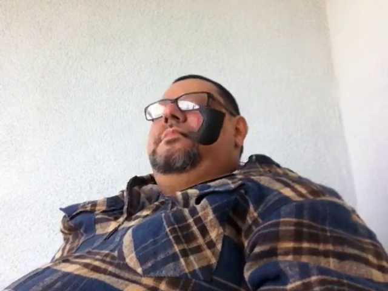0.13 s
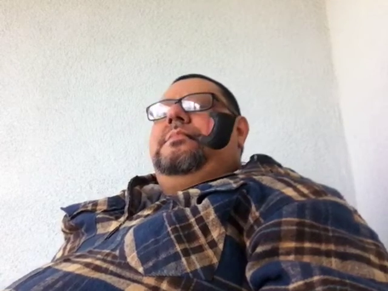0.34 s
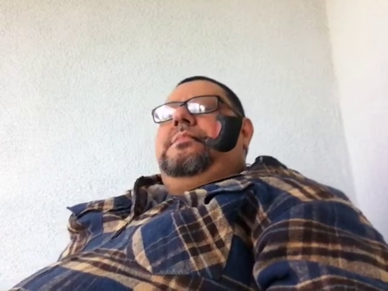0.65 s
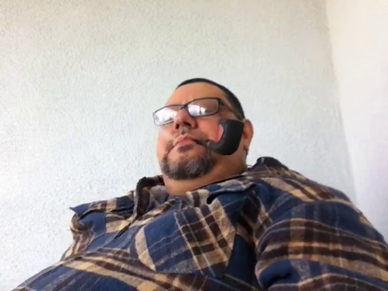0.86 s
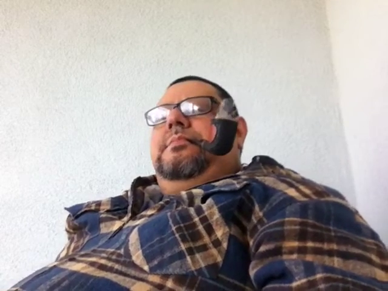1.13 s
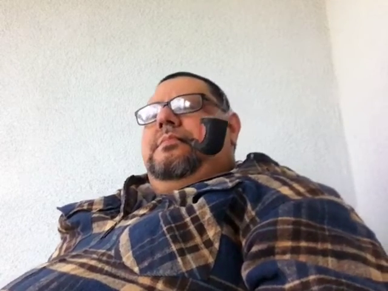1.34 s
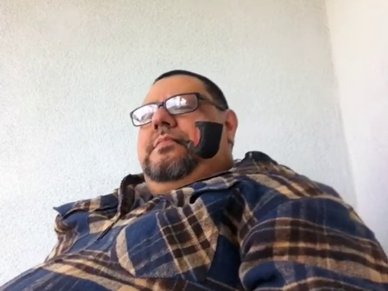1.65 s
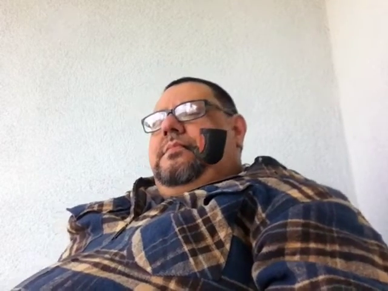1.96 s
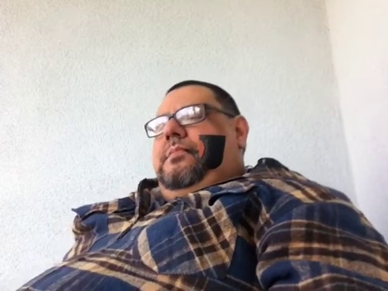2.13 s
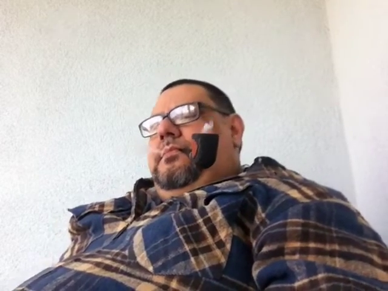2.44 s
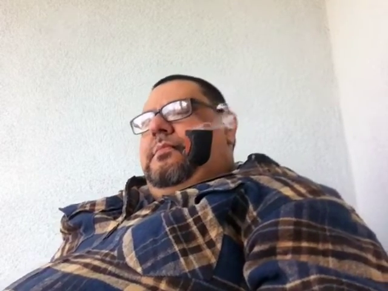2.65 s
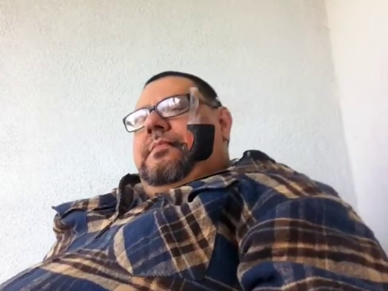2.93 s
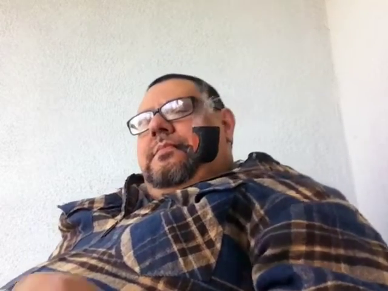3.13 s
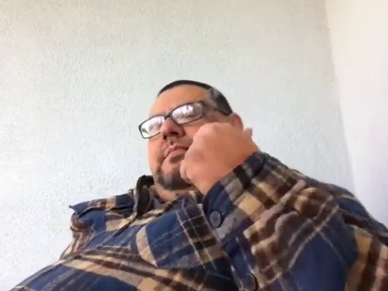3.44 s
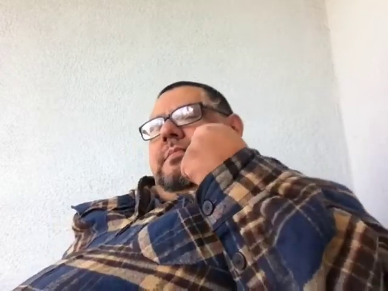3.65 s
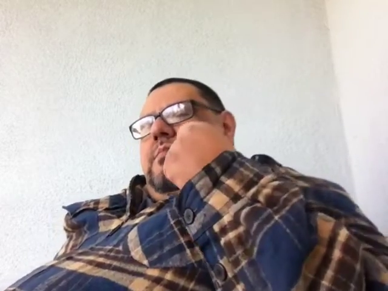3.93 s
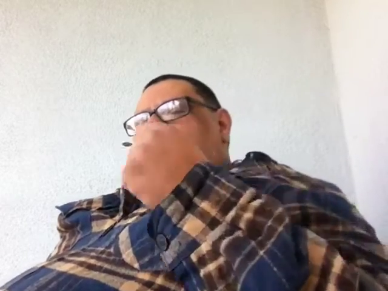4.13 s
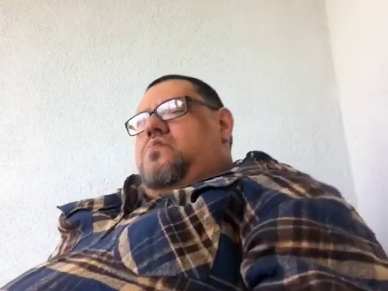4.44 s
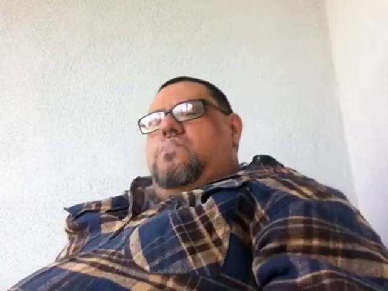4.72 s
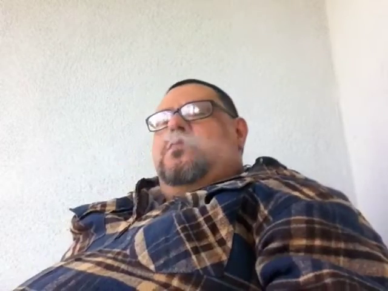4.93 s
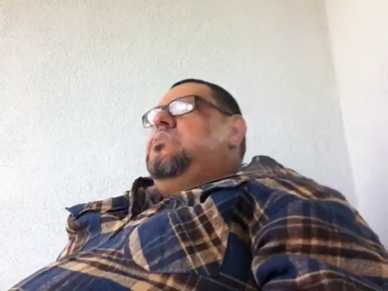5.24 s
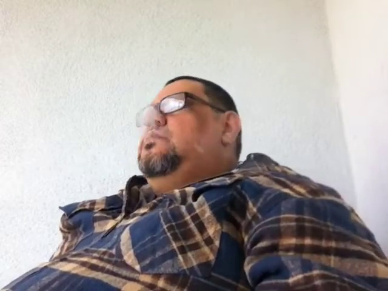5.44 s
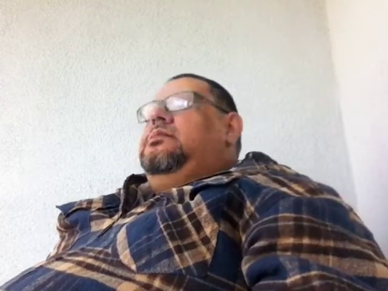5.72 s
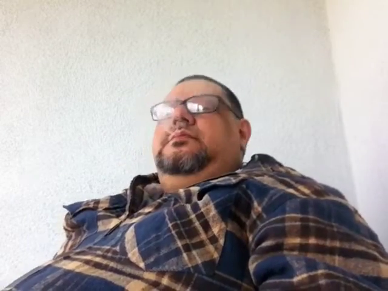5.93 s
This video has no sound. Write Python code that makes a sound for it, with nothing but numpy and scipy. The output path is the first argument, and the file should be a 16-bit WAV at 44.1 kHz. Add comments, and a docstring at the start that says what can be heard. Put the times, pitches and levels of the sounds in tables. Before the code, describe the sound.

Close indoor sound of a chair under a shifting sitter. The first two seconds are sparse, with woody cracks and barely audible chirps over faint room hiss and drone. A firm crack comes next, then brief squeaks. From about three seconds the tilt joint squeals loudly again and again, its pitch bending, one squeal collapsing into a rough scrape.

```python
"""A small, quiet room, with a faint ventilation drone and the microphone close to a desk chair under a shifting sitter.
The frame cracks a few times as it takes the load: each crack is a shaped noise burst with a short ring.
As the chair rocks, two dry contacts in the tilt joint stick and slip.
One sweeps between rasp and whistle: trains of slips, faster or slower with the tilt, kick the joint's resonances.
The other locks into gliding stacks of partials, with faint chirps, then loud squeals, one ending in a rough scrape."""
import sys
import numpy as np
from scipy import signal
from scipy.fft import rfft, irfft, next_fast_len
from scipy.io import wavfile
from scipy.ndimage import uniform_filter1d, map_coordinates

SR = 44100
rng = np.random.default_rng(int(sys.argv[2]) if len(sys.argv) > 2 else 0)


def to_wav(s):
    """Save 16-bit WAV."""
    ch = np.atleast_2d(s).T  # columns
    pcm = np.round(np.clip(ch, -1, 1) * 32767)  # PCM
    wavfile.write(sys.argv[1], SR, pcm.astype(np.int16))


N = 268128  # length in samples
TOP_HZ = 15900  # band limit of the recorder


def amp(db):
    """Decibels to gain."""
    return 10 ** (np.asarray(db) / 20)


def unit(x):
    """Scaled to rms 1."""
    return x / np.sqrt(np.mean(x ** 2) + 1e-20)


def along(points, hz):
    """(Hz, value) points read on a log frequency axis."""
    point_hz, values = np.transpose(points)
    return np.interp(np.log(hz + 1), np.log(point_hz), values)


def curves(rows):
    """Start time in seconds, then one value per sample for each further column."""
    s, *columns = np.transpose(rows)
    t = np.arange(s[0], s[-1], 1 / SR)
    return s[0], *[np.interp(t, s, column) for column in columns]


def wobble(rate, size):
    """A smooth random curve through `rate` random knots a second."""
    knots = rng.standard_normal(int(size * rate / SR) + 4)
    return map_coordinates(knots, [np.arange(size) * rate / SR])


def filtered(x, response):
    """x shaped by a response given as a function of frequency in Hz."""
    m = next_fast_len(len(x) + SR // 4)
    spectrum = rfft(x, m) * response(np.fft.rfftfreq(m, 1 / SR))
    return irfft(spectrum, m)[:len(x)]


def add(track, s, sound):
    """Mix a sound into the track at time s."""
    part = track[max(round(s * SR), 0):][:len(sound)]
    part += sound[:len(part)]


def fade(size):
    """A gate whose ends are rounded over a few milliseconds."""
    return signal.windows.tukey(size, min(1, SR / 150 / size))


def swell(size, attack_s, release_s, fall_db, rise_power=0.59, fall_power=2.24):
    """Level in dB of a rub: it takes hold, stays, then dies ever faster."""
    t = np.arange(1, size + 1) / SR
    rise_db = 20 * rise_power * np.log10(np.minimum(t / attack_s, 1))
    dying = np.clip(1 - (t[-1] - t) / release_s, 0, 1)
    return rise_db - fall_db * dying ** fall_power


# Colour of the room's quiet air. Each row: frequency in Hz, relative level in dB.
AIR_COLOUR = [(15, -73), (25, -31), (64, -23), (123, -3.5), (175, -6.5), (212, -2.5), (249, -4),
              (326, -6.5), (489, -12), (1130, -13.5), (1230, -17), (1440, -19), (2910, -27), (7110, -28.5),
              (16000, -32)]


def ambience(air_db=-59.5, drone_db=-66, drone_hz=209, drone_width_hz=9):
    """Steady room noise, and a soft ventilation drone that wavers because it is a narrow band of noise."""
    air = unit(filtered(rng.standard_normal(N), lambda hz: amp(along(AIR_COLOUR, hz))))
    drone_band = lambda hz: 1 / (1 + ((hz - drone_hz) / drone_width_hz) ** 2)
    drone = unit(filtered(rng.standard_normal(N), drone_band))
    return amp(air_db) * air + amp(drone_db) * drone


# How long the small room rings. Each row: frequency in Hz, time to fall by 60 dB in seconds.
ROOM_DECAY = [(300, 0.33), (1500, 0.29), (4000, 0.24), (9000, 0.2), (15000, 0.042)]


def room(x, gap_s=.004):
    """The small room's tail: diffuse noise after a short gap, in which the treble dies first."""
    hz, t, bands = signal.stft(rng.standard_normal(SR // 2), SR, nperseg=256)
    decay = amp(-60 * t / along(ROOM_DECAY, hz)[:, None])
    tail = signal.istft(bands * decay, SR, nperseg=256)[1]
    tail = np.pad(tail / np.linalg.norm(tail), (int(gap_s * SR), 0))
    return signal.fftconvolve(x, tail)[:N]


# Cracks of the chair's frame as it takes the load. Each row: start in seconds, relative level in dB,
# low thud in dB, bright snap in dB, time to fall by 60 dB in seconds (a fainter ring lasts on).
CRACKS_HEARD = [(0.288, -33, -4, 15, 0.027), (0.486, -51.5, -12, -12, 0.076),
                (0.7995, -26.5, -14, -18, .035), (0.9473, -36, -7.5, -8, 0.078),
                (2.238, -40, 5.5, -14, 0.11), (2.2424, -20.5, 6.5, 3, 0.024)]
# Colour of the frame. Each row: frequency in Hz, relative level in dB.
FRAME_COLOUR = [(150, -41), (300, -24), (480, -14), (700, -5.5), (1000, -9.5), (1430, -1), (1850, -9.5),
                (2500, -3), (3400, -11), (4200, -8.5), (5500, -14), (8000, -18.5), (15500, -19.5)]


def cracks(ring_db=-21, ring_t60=0.13, thud_hz=1100, snap_hz=8000, attack_s=0.00089, grain_db=-0.5,
           bounce_db=-10, bounce_delay_s=.0115):
    """The frame lets go in a burst of tiny slips and rings briefly; a near wall throws the burst back."""
    out = np.zeros(N)
    t = np.arange(SR // 3) / SR
    for start, db, thud_db, snap_db, t60 in CRACKS_HEARD:
        def colour(hz):
            thud = thud_db / (1 + (hz / thud_hz) ** 2)
            snap = snap_db * hz ** 2 / (hz ** 2 + snap_hz ** 2)
            return amp(along(FRAME_COLOUR, hz) + thud + snap)

        slips = rng.standard_normal(len(t)) * amp(grain_db * wobble(2675, len(t)))
        decay = amp(-60 * t / t60) + amp(ring_db - 60 * t / ring_t60)
        onset = 1 - np.exp(-(t / attack_s) ** 2)
        crack = amp(db) * unit(filtered(slips, colour)) * decay * onset
        add(out, start, crack)
        # the bounce comes back slightly dulled
        add(out, start + bounce_delay_s, amp(bounce_db) * uniform_filter1d(crack, size=3))
    return out


# Resonances of the tilt joint. Each row: frequency in Hz, width in Hz, relative level in dB.
JOINT_MODES = [(395, 74, -23), (688, 66, 2.5), (1150, 235, -2), (1784, 157, -1.5), (2860, 223, 3),
               (4560, 690, -8), (5170, 193, -1), (6400, 730, -10), (8860, 960, -10.5), (10460, 930, -15.5),
               (13260, 2000, -8)]


def joint(hz):
    """Response of the joint: a sum of resonances, alternating in sign."""
    response = 0
    for k, (centre, width, db) in enumerate(JOINT_MODES):
        damping = 1j * hz * width
        response = response + (-1) ** k * amp(db) * damping / (centre ** 2 - hz ** 2 + damping)
    return response


# Strokes of the sliding contact. Each row: start in seconds, length in seconds, first slips per second,
# last slips per second, relative level in dB, attack in seconds, fall over the stroke in dB,
# treble corner in Hz.
STROKES = [ (0, 0.11, 410, 49.4, -53, 0.001, 6, 18000), (3.096, 0.076, 770, 1880, -56, 0.01, 9, 1000),
           (4.007, 0.26, 2020, 1520, -42.5, 0.062, 19.5, 1840),
           (4.301, 0.053, 460, 315, -58, 0.021, 6, 4000), (4.352, 0.056, 1650, 1600, -68, .01, 4, 4000),
           (4.462, 0.2, 446, 1820, -54, 0.005, 8, 8300), (4.975, .08, 700, 400, -56, .025, 9, 2200),
           (5.052, .09, 820, 750, -66.5, .005, 10, 9000), (5.356, 0.25, 2120, 1050, -45, 0.13, 23, 4600),
           (5.63, 0.1, 840, 390, -56, 0.012, 9, 4470), (5.832, 0.15, 440, 2040, -52.5, 0.0018, 6.5, 10200),
           ]
SPEED_UP_BEND, SLOW_DOWN_BEND = .72, 0.93  # a stroke's rate moves as this power of its progress


def slides(flutter=0.016, scatter=0.051, rough_below_hz=930, size_db=0.5, grip_db=2.0,
           rattle_t60=0.013, rattle_db=-3.0, direct_db=-3):
    """Every slip kicks the joint; fast slips are regular, slow ones uneven and set the fittings rattling."""
    out = np.zeros(N)
    taps = np.arange(-8, 9)  # samples around a slip, to place it between samples
    t = np.arange(SR // 20) / SR
    for start, length, first_rate, last_rate, level_db, attack_s, fall_db, corner_hz in STROKES:
        size = int(length * SR)
        bend = SPEED_UP_BEND if last_rate > first_rate else SLOW_DOWN_BEND
        rate = first_rate + (last_rate - first_rate) * np.linspace(0, 1, size) ** bend
        db = level_db + swell(size, attack_s, length, fall_db)
        db = db + grip_db * wobble(110.4, size)  # the grip varies along the rubbing face

        # one slip per cycle, scattered in time when slow
        cycles = np.cumsum(rate * (1 + flutter * wobble(203.0, size))) / SR
        at = np.interp(np.arange(.5, cycles[-1]), cycles, np.arange(size))
        rate, db = rate[at.astype(int)], db[at.astype(int)]
        rough = 1 / (1 + (rate / rough_below_hz) ** 4)
        jitter = scatter * rough * SR / rate * rng.standard_normal(len(at))
        at = np.clip(at + jitter, 0, size) + len(taps)
        # slower slips each kick harder
        kick = amp(db + size_db * rng.standard_normal(len(at))) * np.sqrt(SR / rate)
        index = at.astype(int)[:, None] + taps
        pulse = np.sinc(index - at[:, None]) * np.hanning(len(taps))

        def train(share):
            weights = pulse * (kick * share)[:, None]
            return np.bincount(index.ravel(), weights.ravel(), size + len(t))

        rattle = rng.standard_normal(len(t)) * amp(-60 * t / rattle_t60)
        rattle = rattle / np.linalg.norm(rattle)
        rasp = signal.fftconvolve(train(np.sqrt(rough)), rattle)[:size + len(t)]
        direct = train(1 - rough + amp(direct_db) * rough)
        stroke = direct + amp(rattle_db) * rasp
        add(out, start, filtered(stroke, lambda hz: 1 / (1 + 1j * hz / corner_hz)))
    return amp(15.5) * filtered(out, joint)


# Loud squeals of the locking contact, one per rock of the chair. Each row: relative level in dB,
# attack in seconds, release in seconds, brightness of the three lowest partials in dB per octave,
# upper overtones in dB.
SQUEAL_LEVELS = [(-39.5, 0.056, .13, -2.5, -12.5), (-40.5, 0.037, 0.29, 2.5, -8.5),
                 (-42.5, 0.033, .12, 1.2, -3.5), (-40.5, 0.041, 0.21, -0.25, -11),
                 (-41.5, 0.091, .005, -3.5, -13.5)]
# Pitch of each squeal, one list per squeal. Each row: time in seconds, pitch in Hz.
SQUEAL_GLIDES = [
    [(3.325, 1674), (3.385, 1610), (3.421, 1521), (3.455, 1510), (3.505, 1556), (3.561, 1623),
     (3.601, 1510), (3.64, 1326)],
    [(3.922, 1788), (4.05, 1788), (4.19, 1755)],
    [(4.686, 1400), (4.724, 1306), (4.756, 1286), (4.804, 1364), (4.848, 1487), (4.93, 1513), (4.968, 1332),
     (4.986, 1192), (5.0, 1150)],
    [(5.221, 1539), (5.259, 1450), (5.289, 1476), (5.323, 1610), (5.335, 1622), (5.351, 1711),
     (5.407, 1714), (5.54, 1662)],
    [(5.97, 1664), (6.09, 1664)],
]
# Faint chirps of the same contact, and last the rough end of the third squeal, falling into a scrape.
# Each row: start in seconds, length in seconds, first, middle and last pitch in Hz, relative level in dB,
# brightness of the three lowest partials in dB per octave, upper overtones in dB.
PITCH_ARCS = [ (0.192, 0.24, 2700, 3120, 3500, -68.5, -1, -20),
              (1.233, 0.14, 2075, 2027, 2215, -50, -8.5, -15),
              (1.464, 0.17, 1247, 1465, 1586, -84, 13.5, 12),
              (1.618, 0.063, 2910, 2650, 2940, -67, 4.5, -12),
              (1.676, 0.081, 2920, 2993, 3050, -68.5, -5, -12),
              (1.743, .21, 3345, 3465, 3430, -66.5, -15, -20),
              (2.596, 0.057, 1840, 1823, 1825, -58.5, -19, -27),
              (2.697, 0.093, 2450, 2363, 2370, -47.5, -11.5, -27),
              (4.99, 0.057, 1122, 1027, 908, -47, -5, -14), ]
SQUEAL_FALL_DB = 19.5  # lost over a squeal's release


def locked_rubs(arch_db=17, arch_power=3, judder_db=2.5, judder_rate=60):
    """Start, pitch, level, brightness and overtones of each rub; the level of the short arcs judders."""
    for (db, attack_s, release_s, brightness, top_db), glide in zip(SQUEAL_LEVELS, SQUEAL_GLIDES):
        start, hz = curves(glide)
        level_db = db + swell(len(hz), attack_s, release_s, SQUEAL_FALL_DB)
        yield start, hz, level_db, brightness, top_db
    for start, length, first_hz, middle_hz, last_hz, db, brightness, top_db in PITCH_ARCS:
        u = np.linspace(-1, 1, int(length * SR))
        # a simple arc of pitch through the three points
        slope, bow = (last_hz - first_hz) / 2, (first_hz + last_hz) / 2 - middle_hz
        hz = middle_hz + u * slope + u ** 2 * bow
        arch = db - arch_db * np.abs(u) ** arch_power
        yield start, hz, arch + judder_db * wobble(judder_rate, len(u)), brightness, top_db


# How strongly the chair radiates the three lowest partials. Each row: frequency in Hz, relative level in dB.
CHAIR_RADIATION = [(1200, -33), (1350, -15), (1550, -3.5), (1800, -3.5), (2100, -3), (2400, -6.5),
                   (2600, -7.5), (2950, 1.5), (3200, -5), (3550, 1), (3900, -6.5), (4500, -5.5),
                   (5000, -4.5), (5350, -1.5), (6200, -1), (7200, -3.5), (8000, -22)]
# Balance of the upper overtones. Each row: frequency in Hz, relative level in dB.
UPPER_BALANCE = [(5000, 6.5), (6300, -5), (7500, -12), (9500, -14.5), (13000, -21), (16000, -15)]
LOCKED_FLUTTER = .0007  # pitch flutter of a steady lock, as a fraction of the pitch


def squeals(glide_flutter=0.005, loose_flutter=0.29, lock_hz=1280, shimmer_db=1.44,
            ripple_db=4, ripple_hz=150, dulling=0.24):
    """Slips lock to a joint resonance: clean partials, unsteady while the pitch moves, duller when weak."""
    out = np.zeros(N)
    # high partials flicker as they glide across the chair's many close resonances
    peaks = rng.standard_normal(int(SR / ripple_hz))

    def ripple(hz):
        return ripple_db * map_coordinates(peaks, [hz / ripple_hz], order=1, mode="nearest")

    for start, hz, db, brightness, top_db in locked_rubs():
        size = len(hz)
        hz = uniform_filter1d(hz, size=600, mode="nearest")
        glide = np.minimum(np.abs(np.gradient(np.log(hz))) * SR, 3)
        # when the motion gets too slow the lock fails and the tone crumbles into a scrape
        loose = np.maximum(lock_hz / hz - 1, 0)
        flutter = (LOCKED_FLUTTER + glide_flutter * glide) * wobble(301.9, size)
        flutter = flutter + loose_flutter * loose * wobble(900, size)
        phase = 2 * np.pi * np.cumsum(hz * (1 + flutter)) / SR

        def partial(k):
            shimmer = amp(shimmer_db * np.sqrt(k * (0.58 + glide)) * wobble(90.2, size))
            return np.sqrt(2) * np.sin(k * phase) * shimmer * (k * hz < TOP_HZ)

        low = sum(amp(along(CHAIR_RADIATION, k * hz) + brightness * np.log2(k)) * partial(k)
                  for k in range(1, 4))
        upper = unit(sum(amp(along(UPPER_BALANCE, k * hz) + ripple(k * hz)) * partial(k)
                         for k in range(4, 14)))
        upper_gain = amp(top_db + dulling * (db - db.max()))
        add(out, start, amp(db) * (low + upper_gain * upper) * fade(size))
    return out


def scene():
    """The chair's three sounds, each with its share of room, over the room noise."""
    squeal, slide, crack = squeals(), slides(), cracks()
    chair = amp(-0.66) * squeal + slide + crack
    echo = room(amp(-8.0) * squeal + amp(-5.5) * slide + amp(-9.5) * crack)
    return (chair + echo + ambience())[None]


def record(dry):
    """The recorder keeps nothing above its band limit."""
    return np.array([filtered(channel, lambda hz: hz < TOP_HZ) for channel in dry])


dry = scene()
out = record(dry)
to_wav(out)
```